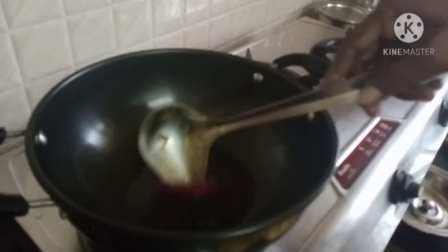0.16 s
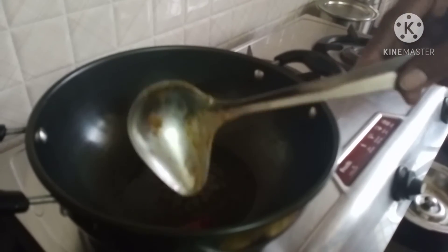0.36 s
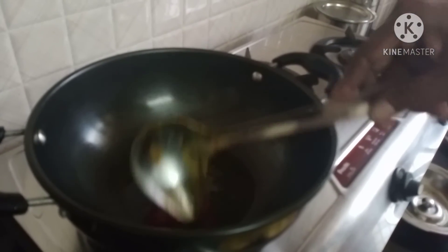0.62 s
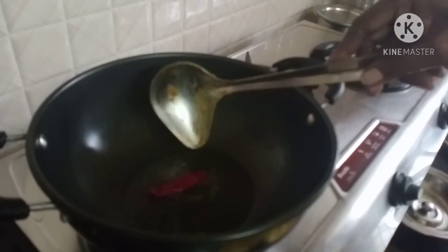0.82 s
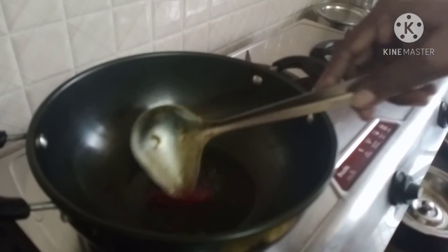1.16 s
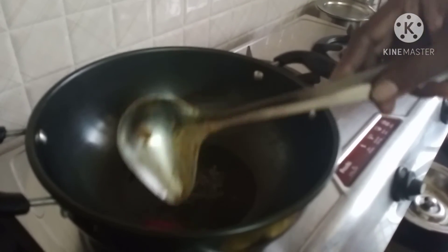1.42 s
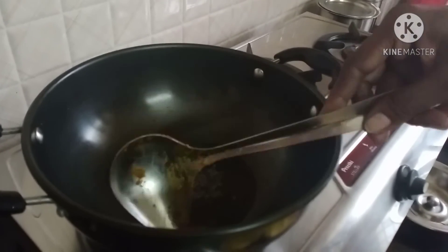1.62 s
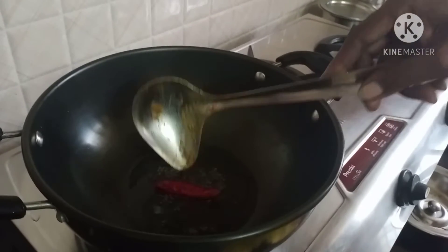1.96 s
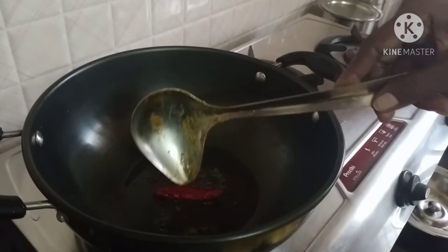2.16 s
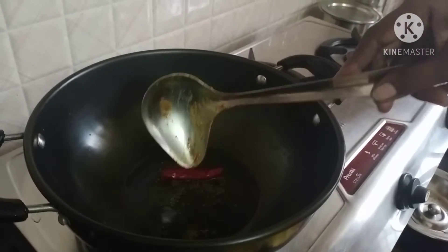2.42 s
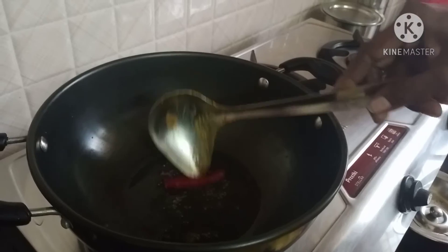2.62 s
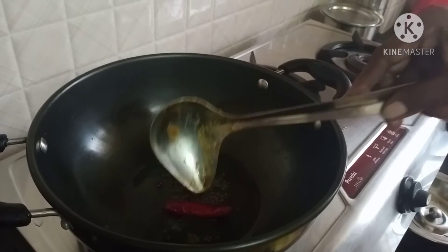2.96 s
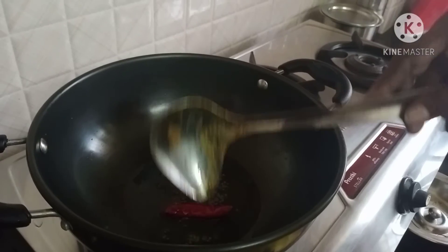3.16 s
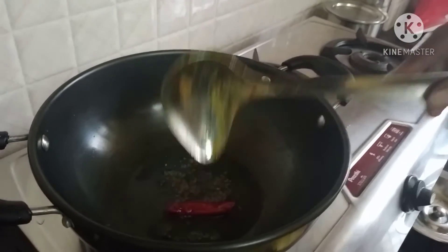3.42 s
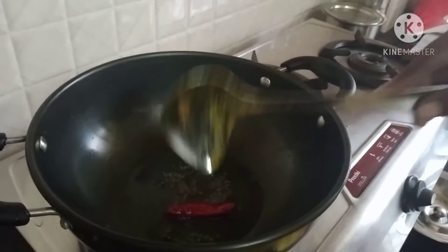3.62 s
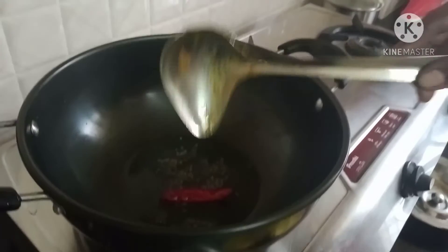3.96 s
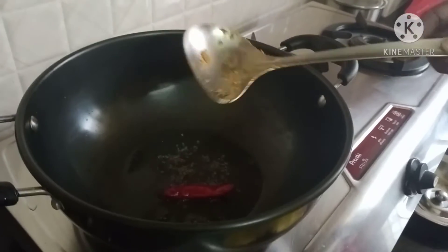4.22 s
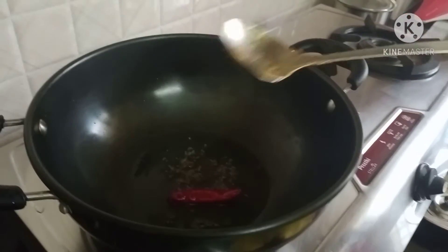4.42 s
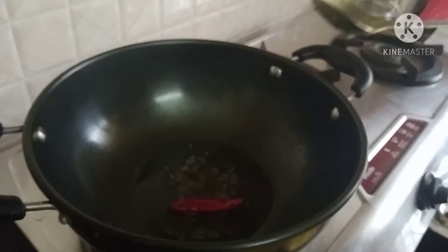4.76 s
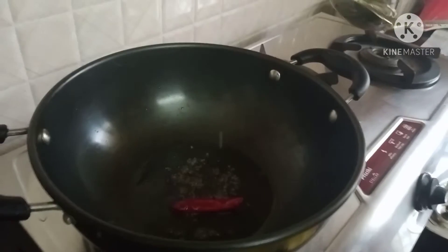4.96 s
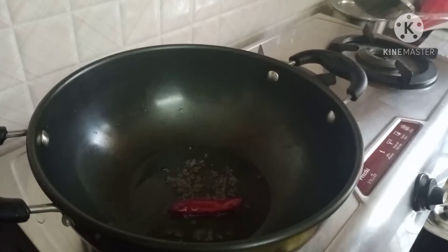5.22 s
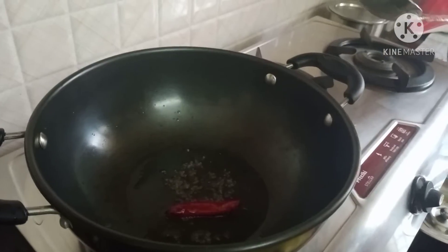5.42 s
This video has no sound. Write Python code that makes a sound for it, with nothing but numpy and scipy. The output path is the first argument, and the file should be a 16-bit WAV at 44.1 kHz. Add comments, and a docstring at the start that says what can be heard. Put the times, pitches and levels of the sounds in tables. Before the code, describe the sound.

Close-up frying in a deep pan: ladle clanks and short scrapes at first, then increasingly dense sharp seed cracks over hissing oil and soft burner rumble.

```python
"""Mustard seeds pop in hot oil in a deep pan, close to a phone in a tiled kitchen.
Dry husks crack as sharp bursts of noise; seeds under the oil plop more slowly and ring like bubbles.
A steel ladle knocks and scrapes the pan as it stirs, made of noise bursts, ringing modes and tiny slips;
the popping thickens once it is lifted out. Flying drops of oil strike the microphone port as pressure steps.
Random clicks and hiss make the oil fizz finely over the rumble of the burner, which is shaped noise."""
import sys
import numpy as np
from scipy import signal
from scipy.fft import rfft, irfft
from scipy.io import wavfile
from scipy.ndimage import uniform_filter1d, minimum_filter1d

SR = 44100
rng = np.random.default_rng(int(sys.argv[2]) if len(sys.argv) > 2 else 0)


def unload_audio(sound):
    """Save the sound as a 16-bit wav file, at the path given as the first command line argument."""
    columns = np.transpose(np.atleast_2d(sound))
    # keep every value between -1 and 1, then stretch to whole-number steps
    steps = np.round(np.clip(columns, -1, 1) * 32767)
    wavfile.write(sys.argv[1], SR, steps.astype(np.int16))


N = 247180  # length of the scene in samples
FFT_SIZE = 4096  # length of one short sound in samples

# What all pops share, heard out of the bowl of the pan: pitch_hz [Hz], gain_db [dB]
POP_COLOUR = [(60, -49), (300, -26.5), (1400, -18), (1900, -16.5), (2700, -13), (3450, -3), (4600, -17.5),
              (5800, -9), (7200, -11), (8500, 0.5), (10400, -11.5), (13000, -13.5), (15500, -14)]


def seeds(gain_db=0.0, ring_octaves=0.45, pan_db=-56, bubble_db=-3):
    """Each pop opens with a crack coloured by the ring of a small cavity; the pan answers faintly."""
    out, hz = np.zeros(N), bins(FFT_SIZE)
    pivot_hz = 8000  # brightness tilts the spectrum round this frequency
    for start_s, level_db, tilt_db, ring_hz, ring_db, contact_s, snap in pops():
        tilt = tilt_db * np.log2(np.maximum(hz, 1000) / pivot_hz)
        ring = resonance(hz, ring_hz, ring_db, ring_octaves)
        cavity = response(gain_db + level_db + tilt + ring + shape(POP_COLOUR, hz))
        opening = crack(contact_s, snap=snap, bowl_db=2.0, bowl_s=0.0066)
        add(out, start_s, signal.fftconvolve(opening, cavity))
        # a strongly ringing pop below 12.5 kHz keeps ringing as a bubble
        depth = np.clip((ring_db - 14) / 10, 0, 1) * (ring_hz < 12500)
        bubble_gain = depth * undb(bubble_db) * np.linalg.norm(cavity)
        add(out, start_s, bubble_gain * bubble(ring_hz))
    return out + undb(pan_db) * pan_ring(out)


def pops():
    """List every pop: sharp cracks, mostly of dry husks, and slower, more ringing plops under the oil."""
    # Sharp cracks: mostly dry husks, one scrape click (0.1092 s) and the snap of an oil drop (4.1438 s);
    # levels before later colouring: start_s [s], level_db [dB], brightness_db [dB per octave]
    crack_rows = [(0.1092, -1.5, 4), (0.2472, 4.5, -2), (1.2183, 11, -2.5), (2.2154, 4, -1.5),
                  (2.259, 2, 0.5), (2.4591, -16.5, 10), (2.5194, -18.5, 4), (2.8709, 2.5, 1.5),
                  (3.015, -14, 7), (3.0576, -6, -1.5), (3.1798, 4.5, 1), (3.2962, -5, -2.5), (3.373, 5, -2),
                  (3.4238, -7, -2.5), (3.5791, 7, -0.5), (3.7049, 9.5, 1.5), (3.7253, -2, 6),
                  (3.916, 4.5, 0.5), (4.036, -7.5, 6), (4.071, 7.5, 0.5), (4.1129, -1.5, -2),
                  (4.1438, -3.5, 10), (4.2088, -2, 0.5), (4.248, 8.5, -0.5), (4.2954, -3, -3),
                  (4.3098, -5.5, -2), (4.5034, 14.5, 0.5), (4.6735, 12, 2), (4.769, 4.5, -1),
                  (4.7874, 0, 0.5), (4.8504, 9.5, -1), (4.8777, 0, 2), (4.8979, 2.5, 2), (4.9517, 9.5, 0),
                  (4.977, 1, 0), (5.1719, 9.5, 3), (5.1887, 6, -0.5), (5.246, -9, 7), (5.2623, 1.5, 5),
                  (5.3038, -9, 1), (5.4614, 5, -1)]
    # Plops of seeds under the oil, and one light ladle touch at 2.72 s;
    # levels at the ring before later colouring: start_s [s], level_db [dB], ring_hz [Hz]
    plop_rows = [(0.1974, 5.5, 8170), (0.448, 4, 4850), (0.5279, 5.5, 6500), (0.5478, 11, 4300),
                 (0.5973, 4, 12500), (0.7484, 3, 3030), (0.764, 11, 3350), (0.7784, 5, 7160),
                 (0.819, 10, 3930), (0.8391, 6.5, 4030), (0.898, 14.5, 4590), (0.9357, 7, 7340),
                 (1.1556, 16.5, 3680), (1.168, 16, 3740), (1.8058, 3.5, 10330), (1.985, 0.5, 10900),
                 (2.2304, 13, 3800), (2.3669, 11.5, 5570), (2.5858, 1, 10300), (2.661, 6.5, 6070),
                 (2.7096, 10, 5870), (2.72, 6.5, 2940), (3.16, 6.5, 8200), (3.3118, 2, 9300),
                 (3.7541, 8, 4180), (3.882, 5, 6140), (4.4204, 12, 4250), (4.5946, 7.5, 3870),
                 (4.748, 4, 5030), (5.3531, 18.5, 4500)]
    husk_hz, husk_ring_db = 11450, 6  # ring given to every sharp crack, as of a husk's small cavity
    dry_contact_s, dry_snap = 0.00046, 0.99
    oily_contact_s, oily_snap = 0.0052, 0.21
    plop_ring_db = 23.5  # ring of a plop at 0 dB
    ring_loss = 0.6942  # dB less ring per dB of level: harder bursts crack more and ring less
    faint_tilt_db, plop_tilt_db = 2.5, -0.5  # dB per octave: tiny husks are bright, oil dulls a plop

    # faint pops stand this many dB above the frying level
    faint_cracks = [(start_s, db, faint_tilt_db) for start_s, db, _ in faint(42, count=30)]
    faint_plops = [(start_s, db, husk_hz / 2 ** size) for start_s, db, size in faint(46.5, count=14)]
    rows = []
    for start_s, db, tilt_db in list(crack_rows) + faint_cracks:
        rows.append((start_s, db, tilt_db, husk_hz, husk_ring_db, dry_contact_s, dry_snap))
    for start_s, db, ring_hz in list(plop_rows) + faint_plops:
        ring_db = plop_ring_db - ring_loss * db
        rows.append((start_s, db - ring_db, plop_tilt_db, ring_hz, ring_db, oily_contact_s, oily_snap))
    return rows


def faint(above_db, count, spread_db=-5):
    """Faint pops at scattered moments follow the frying; gives start in s, level in dB, size 0-1."""
    when, scatter, size = rng.random((count, 3)).T
    times = (np.arange(count) + when) / count * N / SR
    levels_db = frying_db(times) + above_db + spread_db * (2 * scatter - 1)
    return zip(times, levels_db, size)


def crack(contact_s, snap, bowl_db, bowl_s):
    """A sharp snap, a short tearing noise, then quick reflections round the bowl; even in spectrum."""
    tearing = burst(contact_s, FFT_SIZE)
    reflections = undb(bowl_db) * burst(bowl_s, FFT_SIZE)
    x = tearing + reflections
    x[0] -= snap
    # undo the broad ups and downs of the spectrum, so that later colouring decides the tone
    power = uniform_filter1d(np.abs(rfft(x)) ** 2, size=120)
    return signal.fftconvolve(x, response(-10 * np.log10(power)))[:FFT_SIZE]


def bubble(hz, cycles=28, glide=0.0051):
    """A bubble rings briefly, rising slightly in pitch as it reaches the surface."""
    age = np.arange(FFT_SIZE) / SR * hz / cycles  # 1 after this many cycles
    return unit(np.exp(-age) * np.sin(2 * np.pi * cycles * (age + glide * age ** 2)))


def ladle(gain_db=-2.5, modes_db=-35, spot_octaves=0.94):
    """Steel meets the oily pan: a dense clatter, coloured by the spot it hits, and the modes ring on."""
    # Ladle on pan, relative levels; contact is how fast the clatter dies, ring is that of the metal:
    # start_s [s], level_db [dB], contact_s [s], favoured_hz [Hz], ring_db [dB]
    knock_rows = [(0.036, -1.5, 0.0051, 1390, -7.5), (0.0395, -4, 0.0025, 565, -6.5),
                  (1.0857, -7.5, 0.005, 1140, 0.5), (1.099, -11.5, 0.0066, 1600, -10),
                  (1.696, -18, 0.0046, 670, -5), (2.232, -20, 0.00097, 3720, -12)]
    # The dense clatter of a knock: pitch_hz [Hz], gain_db [dB]
    clatter_colour = [(40, -20), (110, -48), (180, 12.5), (350, 4), (580, 14), (1000, 5), (1200, 7.5),
                      (1550, 15.5), (1950, -2.5), (2350, 16.5), (2800, 6.5), (3650, 25), (4500, 5.5),
                      (5600, 13.5), (8600, 20), (10500, 14), (15000, 5)]
    tilt_db, spot_db = -1, 10.5  # brightness in dB per octave; lift of the favoured frequency in dB
    out, hz = np.zeros(N), bins(FFT_SIZE)
    for start_s, level_db, contact_s, spot_hz, ring_db in knock_rows:
        contact = crack(contact_s, snap=0.19, bowl_db=-10.0, bowl_s=0.021)
        tilt = tilt_db * np.log2(np.maximum(hz, 200) / 1500)
        blow = level_db + tilt + resonance(hz, spot_hz, spot_db, spot_octaves)
        clatter = response(gain_db + blow + shape(clatter_colour, hz))
        add(out, start_s, signal.fftconvolve(contact, clatter))
        add(out, start_s, undb(modes_db + ring_db) * pan_ring(response(blow)))
    return out


def pan_ring(blows, scatter_db=1.0):
    """Blows set the metal ringing in its modes, whose strengths and signs are drawn afresh each time."""
    # Pan and ladle modes; decay is the time to fall by 60 dB:
    # pitch_hz [Hz], level_db [dB, before the scatter], decay_s [s]
    metal_modes = [(178, -10, .4), (225, -16, .4), (319, -7, .67), (385, -8, .6), (522, -14, .45),
                   (625, -9, .65), (688, -10, .55), (919, -5, .55), (927, -9, .3), (1327, -9, .4),
                   (1520, -6, .5), (1577, -5, .4), (1673, -6, .42), (2286, -10, .45), (2416, -9, .5),
                   (2473, -10, .45), (3118, -8, .5), (3432, -9, .4), (3536, -8, .45), (3622, -5, .4),
                   (3678, -5, .5), (3790, -11, .3), (5494, -14, .45), (6378, -16, .45), (8559, -13, .4),
                   (8834, -14, .4), (10385, -5, .18)]
    t = np.arange(SR) / SR
    gains = undb(scatter_db * rng.standard_normal(len(metal_modes)))
    gains = gains * rng.choice([-1, 1], len(metal_modes))
    ring = 0
    for gain, (pitch_hz, level_db, decay_s) in zip(gains, metal_modes):
        ring = ring + gain * undb(level_db - 60 * t / decay_s) * np.sin(2 * np.pi * pitch_hz * t)
    return signal.fftconvolve(blows, ring)[:N]


def scrape(count=6):
    """The edge catches and slips in uneven little steps; each contact spot squeaks at its own pitch."""
    # Tone of the dragging edge: pitch_hz [Hz], gain_db [dB]
    drag_colour = [(200, -5.5), (1500, 0), (2700, -7.5), (3600, -4), (4600, -15.5), (6000, -8.5),
                   (7200, -9.5), (8600, -1.5), (11000, -9), (15000, -28)]
    slip, hz = crack(contact_s=0.00077, snap=0.1, bowl_db=4.5, bowl_s=0.0035), bins(FFT_SIZE)
    slips = 0
    for spot_hz in np.geomspace(2800, 13000, count):
        squeak = response(resonance(hz, spot_hz, lift_db=18.0, octaves=0.2))
        one_slip = signal.fftconvolve(slip, unit(squeak))
        slips = slips + signal.fftconvolve(grains(rate=130, spread_db=3.0), one_slip)[:N]
    return level(colour(slips, drag_colour), 0) * pressure()


def pressure(swell=0.36):
    """Each stroke presses the ladle on and eases it off again in one smooth arch."""
    # Strokes of the ladle's edge over seeds and metal: start_s [s], length_s [s], level_db [dB]
    stroke_rows = [(0.088, 0.11, -34), (0.644, 0.32, -52), (1.096, 0.1, -41.5), (1.284, 0.2, -51),
                   (1.681, 0.13, -48.5), (1.867, 0.22, -57), (2.242, 0.17, -49.5)]
    t = np.arange(N) / SR
    total = 0
    for start_s, length_s, level_db in stroke_rows:
        progress = np.clip((t - start_s) / length_s, 0, 1)
        total = total + undb(level_db) * np.abs(np.sin(np.pi * progress)) ** swell
    return total


def drops(leak_hz=120, wetting_s=.00004):
    """A drop on the port is a quick, slightly rounded pressure step that leaks away."""
    # Oil drops on the microphone port, levels before the bass cut and limiter: start_s [s], level_db [dB]
    drop_rows = [(3.5785, -15), (4.1448, 4), (4.5037, -33), (4.85, -27.5), (5.2621, 1)]
    out, t = np.zeros(N), np.arange(FFT_SIZE) / SR
    rise = 1 - (1 + t / wetting_s) * np.exp(-t / wetting_s)
    leak = np.exp(-2 * np.pi * leak_hz * t)
    for start_s, level_db in drop_rows:
        add(out, start_s, undb(level_db) * rise * leak)
    return out


def fizz(hiss_db=-2, crackle_db=-5, lift_db=14, count=8):
    """Tiny steam bubbles burst over a smooth hiss; fewer, larger ones tick, each size at its own pitch."""
    # Tone of the fine fizz: pitch_hz [Hz], gain_db [dB]
    fizz_colour = [(600, -8), (2400, -8), (3500, -8), (4500, -35), (5400, -7.5), (7400, -14.5), (8700, 4),
                   (10000, -12), (15500, -3.5)]
    tick, hz = crack(contact_s=0.00012, snap=1.0, bowl_db=14.5, bowl_s=0.024), bins(FFT_SIZE)
    fine = signal.fftconvolve(grains(rate=700, spread_db=2.5), tick)[:N]
    hiss = level(rng.standard_normal(N), hiss_db)
    oil = colour(level(fine, 0) + hiss, fizz_colour)
    crackle = 0
    for bubble_hz in np.geomspace(3200, 14000, count):
        tone = response(resonance(hz, bubble_hz, lift_db, octaves=0.23) + shape(POP_COLOUR, hz))
        large_tick = unit(signal.fftconvolve(tick, tone))
        crackle = crackle + signal.fftconvolve(grains(rate=7, spread_db=4.5), large_tick)[:N]
    return (level(oil, 0) + level(crackle, crackle_db)) * undb(frying_db(np.arange(N) / SR))


def frying_db(t):
    """How hard the oil is frying at a moment, in dB, read between the points of a table."""
    # The rise and fall of the frying: time_s [s], level_db [dB]
    frying_points = [(0, -49.5), (.7, -59), (1.5, -56), (2.1, -59.5), (2.8, -56), (3.4, -51.5),
                     (4.4, -49.5), (5.6, -55.5)]
    return np.interp(t, *np.transpose(frying_points))


def burner(rumble_db=-57, hum_hz=100, hum_db=-66):
    """The flame rumbles steadily, as shaped noise, with a faint steady hum under it."""
    # Tone of the flame: pitch_hz [Hz], gain_db [dB]
    flame_colour = [(25, -2), (45, -6), (78, -4.5), (102, 4), (150, -1.5), (380, -7), (520, -5.5),
                    (1300, -11.5), (2400, -17), (6000, -36)]
    rumble = colour(rng.standard_normal(N), flame_colour)
    hum = np.sin(2 * np.pi * hum_hz * np.arange(N) / SR)
    return level(rumble, rumble_db) + level(hum, hum_db)


def kitchen(x, wet_db=-8, t60_s=0.62, build_s=0.001, count=6):
    """Tiled walls return a dense, bright echo; random tails take turns, so it keeps no fixed tone."""
    # How strongly the kitchen answers: pitch_hz [Hz], gain_db [dB]
    room_colour = [(100, 9.5), (700, 8.5), (3500, 0.5), (5500, 0.5), (8700, 1.5), (14000, 0)]
    t, out = np.arange(SR) / SR, x
    turn_number = np.arange(N) // (SR // 10) % count  # the next tail's turn comes every 0.1 s
    for k in range(count):
        tail = colour(rng.standard_normal(SR), room_colour)
        tail = tail * undb(-60 * t / t60_s) * (1 - np.exp(-t / build_s))
        turn = uniform_filter1d(1. * (turn_number == k), size=200)  # soft edges
        out = out + undb(wet_db) * signal.fftconvolve(x * turn, unit(tail))[:N]
    return out


def undb(db):
    """Decibels to gain."""
    return 10 ** (np.asarray(db) / 20)


def level(x, db):
    """Set the rms level."""
    return x * undb(db) / np.sqrt(np.mean(x ** 2))


def unit(x):
    """Scale to an energy of one."""
    return x / np.sqrt(np.sum(x ** 2))


def bins(size):
    """Frequencies in Hz of a spectrum of this many samples, with zero raised to 1 Hz."""
    return np.maximum(np.fft.rfftfreq(size, 1 / SR), 1)


def shape(points, hz):
    """Read (Hz, dB) points on a log-frequency axis."""
    f, db = np.transpose(points)
    return np.interp(np.log(hz), np.log(f), db)


def colour(x, points):
    """Filter a signal with the gain curve of (Hz, dB) points."""
    return irfft(rfft(x) * undb(shape(points, bins(len(x)))), len(x))


def resonance(hz, centre_hz, lift_db, octaves):
    """A bell-shaped lift in dB round one frequency."""
    return lift_db / (1 + (np.log2(hz / centre_hz) / octaves) ** 2)


def response(db):
    """Turn a gain curve into a short sound that starts at once (causal), through its cepstrum."""
    cepstrum = irfft(np.log(undb(db)))
    fold = 1 + np.sign(FFT_SIZE / 2 - np.arange(FFT_SIZE))  # moves the later half onto the earlier
    fold[0] = 1
    return irfft(np.exp(rfft(cepstrum * fold)))


def burst(decay_s, size):
    """Noise that dies away exponentially, of unit energy."""
    return unit(rng.standard_normal(size) * np.exp(-np.arange(size) / SR / decay_s))


def grains(rate, spread_db):
    """Clicks at random moments, this many a second on average, most of them faint."""
    sizes = undb(spread_db * np.minimum(rng.exponential(size=N), 4))
    return (rng.random(N) < rate / SR) * sizes * rng.choice([-1, 1], N)


def add(out, s, x):
    """Mix a sound in at a time in seconds."""
    i = max(int(s * SR), 0)
    out[i:i + len(x)] += x[:max(N - i, 0)]


def limiter(x, ceiling=0.55, ahead_s=0.026, ramp_s=0.0081):
    """Turns the gain down just ahead of any peak above the ceiling, and straight back up after it."""
    ahead, ramp = int(ahead_s * SR / 2), int(ramp_s * SR / 2)
    allowed = ceiling / np.maximum(np.abs(x), ceiling)
    held = minimum_filter1d(allowed, 2 * (ahead + ramp) + 1)
    return x * uniform_filter1d(np.roll(held, -ahead), 2 * ramp + 1)


def scene():
    """Pops, ladle and scrape echo in the kitchen; fizz, burner and drops are added without echo."""
    pan = seeds() + ladle() + scrape()
    return (kitchen(pan) + fizz() + burner() + drops())[None]


def record(dry, cut_hz=95, damping=0.63, top_hz=15700):
    """The phone's bass cut turns pressure steps into damped swings; it limits the peaks and cuts the top."""
    w = 2 * np.pi * cut_hz
    bass_cut = signal.bilinear([1, 0, 0], [1, 2 * damping * w, w ** 2], SR)
    heard = signal.lfilter(*bass_cut, dry)
    top_cut = signal.ellip(8, .2, 70, top_hz, fs=SR, output="sos")
    return signal.sosfilt(top_cut, limiter(heard))


dry = scene()
out = record(dry)
unload_audio(out)
```